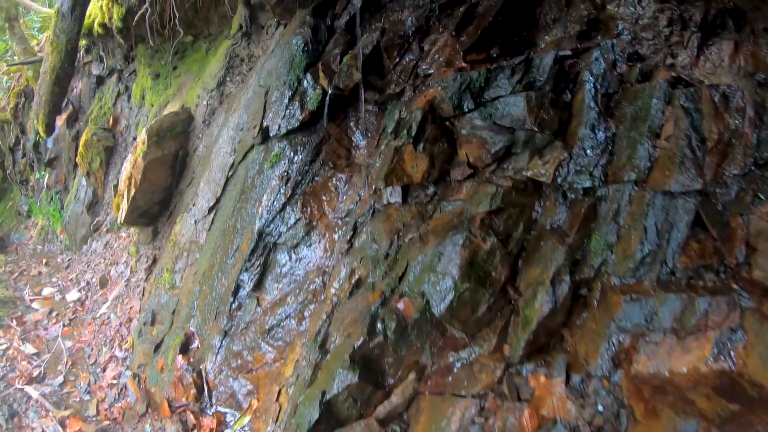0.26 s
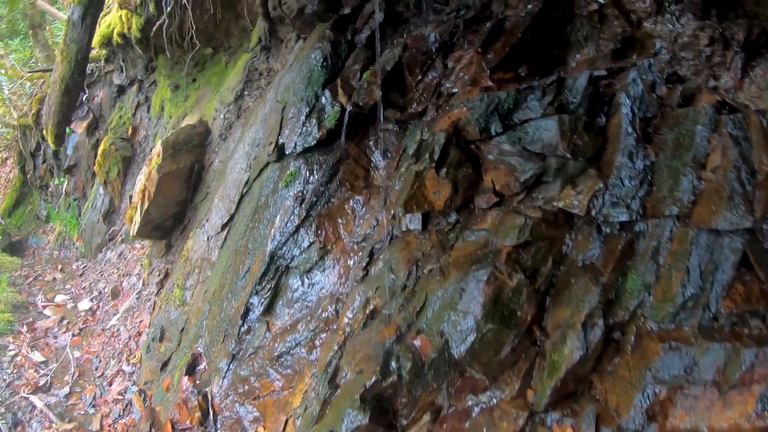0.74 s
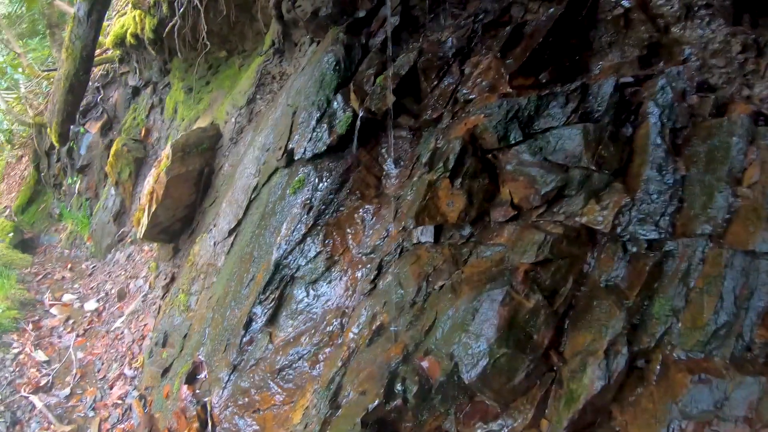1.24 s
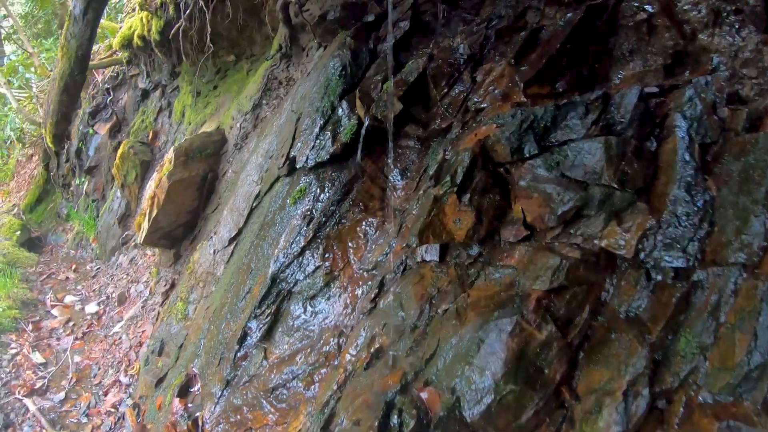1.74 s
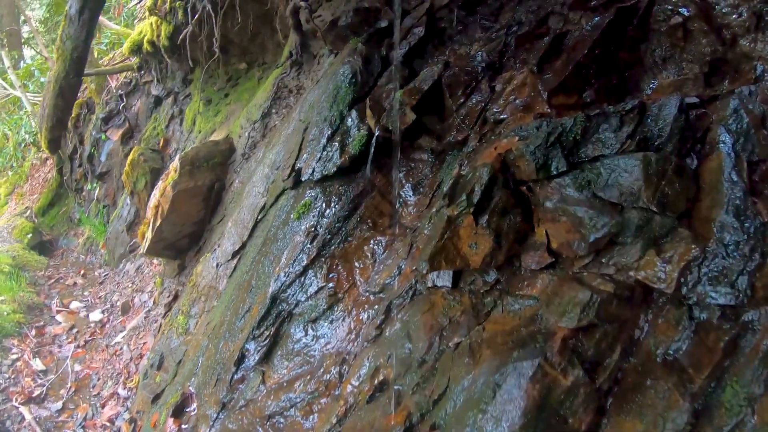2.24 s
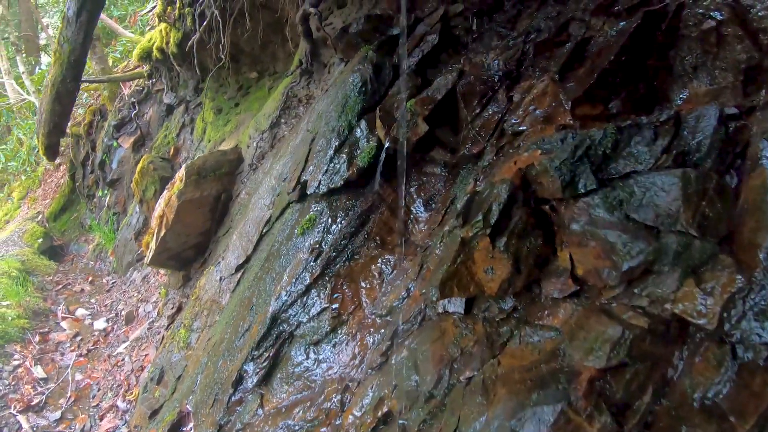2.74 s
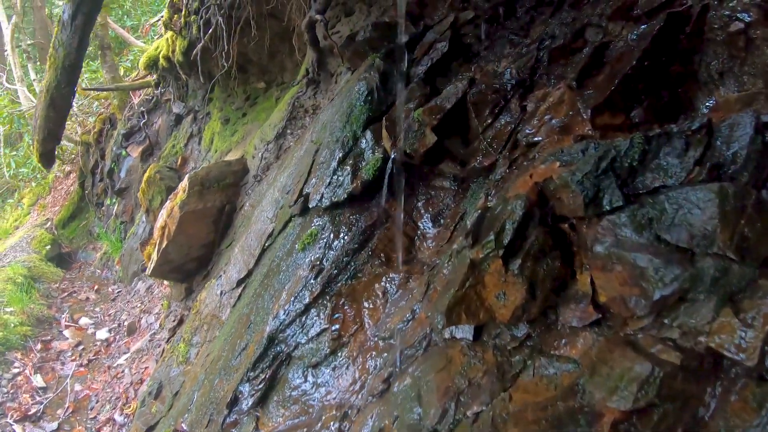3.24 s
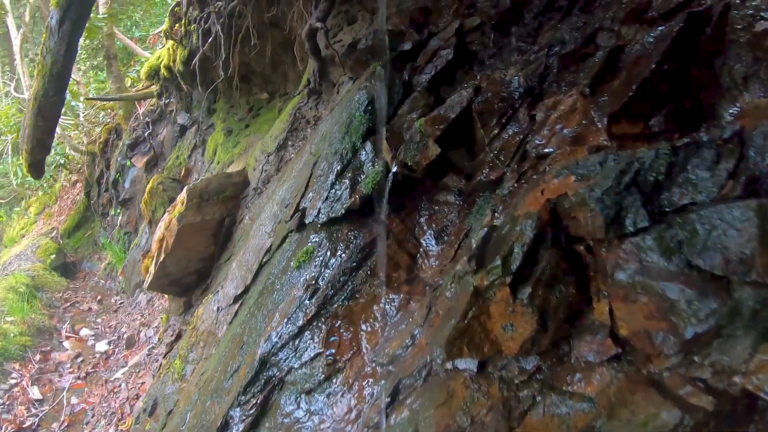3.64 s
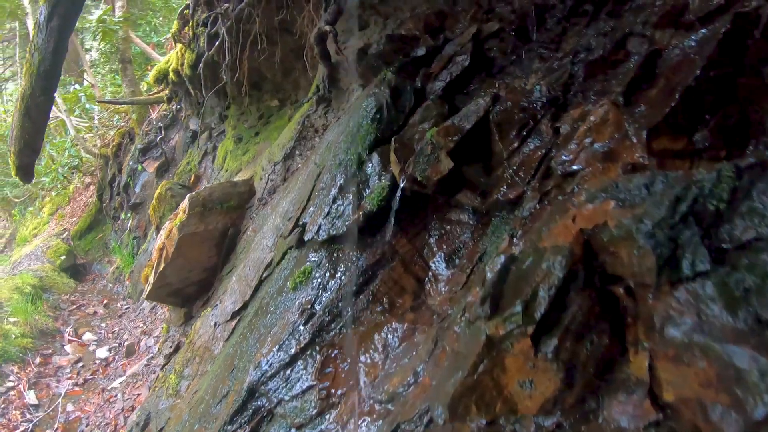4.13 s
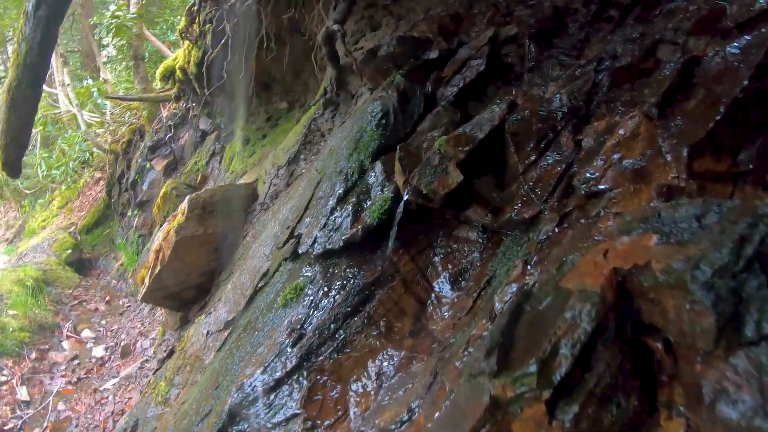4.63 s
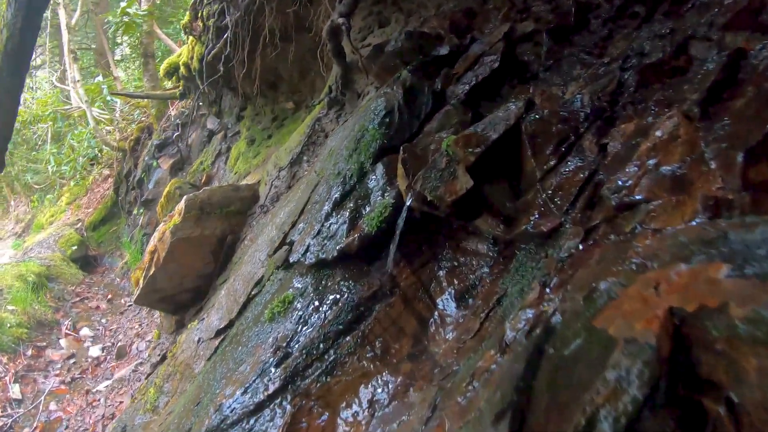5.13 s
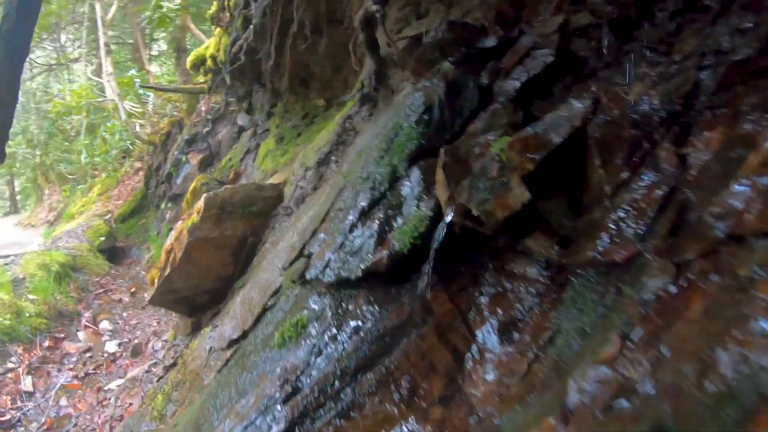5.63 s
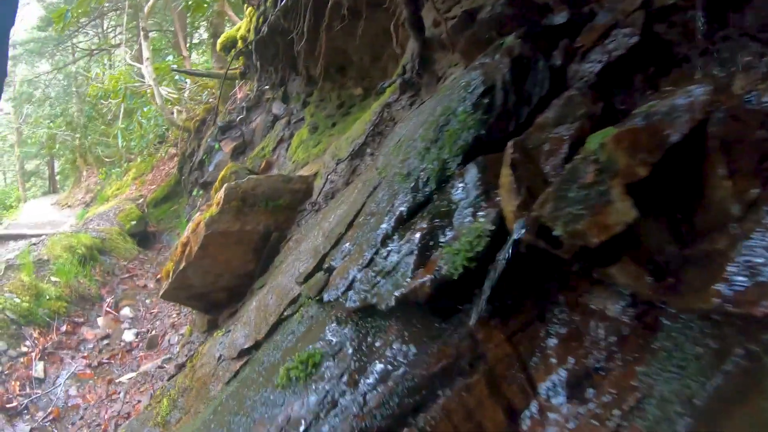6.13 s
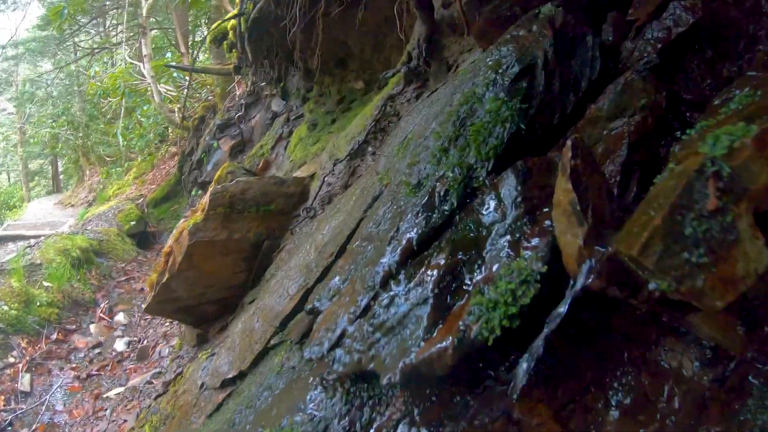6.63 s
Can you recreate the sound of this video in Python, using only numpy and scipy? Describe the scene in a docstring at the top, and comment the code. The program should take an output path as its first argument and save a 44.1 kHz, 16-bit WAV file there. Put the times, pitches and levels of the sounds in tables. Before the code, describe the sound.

Close, crisp dripping from a rocky overhang, about two dozen drips a second with varied pitches, short rough echoes and a faint hissing trickle.

```python
"""From the start, drops fall quickly from a wet rock overhang in a forest, close to a small stereo camera.
Each pops at its own pitch, throws noisy spray and is answered by dense short echoes from the broken rock.
All along, small pops sound, small droplets patter, and shaped noise makes a thin fizzing trickle and
a murmuring far stream. A faint humming band of noise sinks in pitch; a deep rumble grows near the end."""
import sys
import numpy as np
from scipy import signal
from scipy.fft import rfft, irfft, next_fast_len
from scipy.io import wavfile
from scipy.ndimage import uniform_filter1d, map_coordinates

SR = 44100
rng = np.random.default_rng(int(sys.argv[2]) if len(sys.argv) > 2 else 0)


def natural_amplitude(level_db):
    """Convert a level in decibels to a linear amplitude factor, elementwise."""
    exponent = np.asarray(level_db, float) / 20
    return 10 ** exponent


def dump_mix(stems):
    """Bounce the given channels to the path in sys.argv[1] as a 16-bit WAV at rate SR."""
    frames = np.atleast_2d(stems).T  # one column per channel
    limited = np.clip(frames, -1, 1)  # hard clip at full scale
    pcm = np.round(limited * 32767).astype(np.int16)
    wavfile.write(sys.argv[1], SR, pcm)


N = 302991  # length in samples

# The clear drops. Each row: start in seconds, level in dB, pitch of the pop in Hz,
# level of the spray's treble in dB, sharpness of the pop's pitch (a plain number).
CLEAR_DROPS = [(0.037, -37, 9700, -37.5, 5.4), (0.1013, -35, 4700, -44, 1.7),
               (0.172, -32.5, 4000, -44, 1.4), (0.2062, -24, 9800, -42, 5), (0.285, -33.5, 4300, -46, 7.7),
               (0.3064, -34, 7640, -65, 9.9), (0.416, -35.5, 2430, -53, 3.1), (0.465, -45, 4400, -73, 4),
               (0.5377, -40.5, 2500, -44.5, 3.6), (0.61, -28.5, 4430, -38.5, 0.68),
               (0.661, -32, 10000, -40.5, 1.8), (0.6864, -34.5, 1920, -38, 0.66),
               (0.701, -19, 4960, -59, 2.1), (0.8248, -30, 4130, -64, 3.5), (0.864, -29.5, 4030, -63, 2.8),
               (0.917, -41, 3260, -50, 2.8), (0.9666, -34.5, 2580, -40, 2), (0.9858, -37, 6960, -38, 7.9),
               (1.03, -28.5, 4530, -37.5, 1.4), (1.0866, -33.5, 3200, -51, 2.9),
               (1.1161, -32.5, 4830, -39.5, 1.7), (1.1619, -31, 6900, -40, 2.7),
               (1.244, -42, 6950, -39, 0.33), (1.29, -35, 3800, -51, 0.51), (1.321, -32, 3920, -43, 1.3),
               (1.3607, -32.5, 6140, -63, 4.6), (1.3813, -35, 9310, -43, 1.9), (1.398, -34, 3780, -39, 1.1),
               (1.4975, -22, 4050, -59, 1.7), (1.527, -37, 3330, -44, 2.7), (1.5492, -34, 6400, -59, 2.8),
               (1.5773, -28, 5900, -41.5, 1.6), (1.621, -45.5, 3220, -62, 3), (1.6894, -43, 3500, -44, 1.9),
               (1.7129, -22, 3960, -29.5, 2), (1.779, -41, 3980, -38.5, 2.9), (1.81, -35, 5850, -34, 6.5),
               (1.8917, -35, 2890, -65, 1.7), (1.932, -12.5, 2530, -39, 1.58), (1.987, -57, 6500, -72, 4),
               (2.032, -36, 5130, -40, 4.7), (2.056, -39, 3000, -47, 0.53), (2.0925, -32, 4140, -46, 2.3),
               (2.135, -41, 9500, -61, 2.7), (2.156, -24.5, 3710, -40, 3.6),
               (2.184, -34.5, 3660, -45.5, 5.5), (2.2653, -34.5, 3530, -39, 4.2),
               (2.327, -36, 7750, -38, 3.7), (2.352, -37, 5050, -34.5, 1.2),
               (2.3995, -32.5, 7500, -44, 1.5), (2.441, -40.5, 6320, -66, 7.7),
               (2.4883, -38.5, 5200, -40, 10), (2.511, -24.5, 3070, -42, 2.4),
               (2.593, -37.5, 3500, -39.5, 2.3), (2.653, -31.5, 4170, -67, 4.3),
               (2.7255, -40, 3100, -73, 3.3), (2.7694, -42, 1680, -63, 2.6), (2.802, -31, 4130, -51, 6),
               (2.842, -27.5, 2500, -42.5, 1.3), (2.8714, -30.5, 2660, -42.5, 1.9),
               (2.909, -41, 4500, -43, 7), (2.9432, -39, 3700, -35, 4), (2.962, -31.5, 3600, -67, 5.3),
               (3.027, -21, 2850, -38, 1.54), (3.054, -30, 5250, -61, 1.3), (3.1053, -36.5, 3320, -44, 5.9),
               (3.144, -30, 7600, -57, 1.7), (3.1888, -42, 5600, -41, 1.4), (3.211, -38, 9850, -47, 2.5),
               (3.2298, -31, 9710, -60, 3.7), (3.257, -39, 6470, -62, 2.4), (3.291, -34, 3320, -35.5, 2.1),
               (3.3398, -36, 5900, -65, 1.2), (3.37, -34, 9900, -72, 6), (3.4024, -26, 9000, -38.5, 1.5),
               (3.503, -32.5, 2680, -68, 4.9), (3.5443, -39, 5640, -63, 2.3),
               (3.5656, -36.5, 7500, -63, 5.4), (3.6148, -24.5, 3160, -25, 4.5),
               (3.682, -39, 7200, -39.5, 0.99), (3.738, -34, 2800, -48, 0.46), (3.816, -36, 1760, -46, 2.7),
               (3.8543, -46, 9520, -30.5, 3), (3.8686, -21, 2560, -30, 6.2),
               (3.9026, -37, 2560, -44.5, 2.8), (3.938, -38, 7560, -41, 2.1),
               (3.957, -32.5, 3070, -44.5, 4.4), (4.019, -27, 9400, -31, 3.4), (4.05, -32, 4850, -39, 3.7),
               (4.126, -30, 7570, -34.5, 5.3), (4.2126, -51, 4320, -45, 2.4),
               (4.2313, -31.5, 2870, -39, 0.4), (4.2775, -41, 6750, -59, 3.6),
               (4.317, -29.5, 6510, -34.5, 1.7), (4.3735, -43, 3560, -38, 0.87),
               (4.407, -31, 3280, -38.5, 2.4), (4.4645, -37.5, 6400, -44, 1.6),
               (4.51, -35, 7000, -40.5, 3.4), (4.541, -32.5, 4070, -42, 5.4), (4.594, -34, 3770, -40, 6),
               (4.6517, -29.5, 2080, -59, 5.4), (4.7308, -38, 3420, -37.5, 14),
               (4.768, -33, 6270, -38, 2.1), (4.778, -30, 4150, -32.5, 1.4),
               (4.8424, -35.5, 3370, -54, 3.3), (4.8541, -37, 3100, -38.5, 1.4),
               (4.902, -43, 6600, -63, 3.5), (4.9262, -38.5, 9600, -71, 2.9), (4.967, -41, 2790, -65, 3.5),
               (4.987, -34, 3500, -43.5, 2.2), (5.045, -41, 4670, -40.5, 0.65),
               (5.078, -38, 4940, -48, 1.7), (5.127, -38, 4550, -64, 11), (5.1627, -43, 2900, -48.5, 2.8),
               (5.198, -29.5, 3000, -54, 3), (5.211, -34, 4330, -35.5, 1.9), (5.2687, -16.5, 2530, -42, 3),
               (5.3145, -40, 5210, -44, 2.3), (5.331, -42.5, 2330, -59, 1.2), (5.3623, -37, 5300, -48, 6.7),
               (5.395, -37, 4310, -42.5, 3.4), (5.436, -38.5, 6800, -42.5, 3.9),
               (5.472, -37, 4190, -42, 3.2), (5.4937, -45, 3680, -42, 1), (5.5541, -38, 6180, -37.5, 1.4),
               (5.6074, -37, 3280, -45, 1.2), (5.6232, -33, 1620, -36, 5.6), (5.6506, -34, 3970, -41, 2),
               (5.694, -33, 1690, -40.5, 4.5), (5.7271, -31, 4770, -46.5, 1.6),
               (5.7575, -28.5, 7100, -57, 2), (5.7737, -15, 4600, -55, 3), (5.792, -25, 6850, -56, 0.67),
               (5.8861, -32.5, 4760, -40.5, 3.1), (5.921, -37, 3760, -69, 3.7),
               (5.939, -24, 6950, -56, 2.7), (5.9992, -41.5, 3170, -39, 3.3), (6.0515, -32, 3380, -47, 1.4),
               (6.113, -24, 3830, -33, 1.2), (6.163, -44, 7200, -41, 2.9), (6.176, -37, 3320, -44, 0.8),
               (6.213, -35, 8700, -38.5, 6.6), (6.2715, -32, 4800, -51.5, 0.73),
               (6.2927, -30, 3650, -61, 0.66), (6.3388, -25.5, 5440, -48, 1.9),
               (6.4052, -26, 4600, -38, 0.55), (6.4499, -39, 6990, -42.5, 4.4),
               (6.489, -27, 5140, -53, 1.7), (6.521, -37, 6900, -44, 2.9), (6.5407, -37.5, 4040, -40, 2.2),
               (6.6006, -36, 7140, -55, 1.9), (6.6621, -37, 5900, -40.5, 3.7), (6.666, -31, 2915, -48, 7.8),
               (6.7015, -30.5, 7660, -61, 5.4), (6.7553, -22, 5120, -27.5, 2.6),
               (6.808, -35, 3780, -38.5, 3.6), (6.848, -40, 8100, -68, 3.5)]
# The side on which the drops are heard drifts slowly. Each row: time in seconds, left over right in dB.
SIDE_DRIFT = [(0.0, 0), (0.8, -0.5), (2.5, -1.5), (4.2, -2), (5.4, -2), (6.87, -2)]
# The far water swells and ebbs. Each row: time in seconds, low gurgle level in dB, stream level in dB.
WATER_FLOW = [(0.0, -79, -65.5), (0.5, -76, -68.5), (1.3, -83.5, -66), (2.0, -76, -68.5), (2.2, -69, -68),
              (2.38, -80.5, -66.5), (2.53, -67.5, -62.5), (2.7, -81.5, -65.5), (3.1, -72.5, -68.5),
              (3.4, -79, -68), (4.0, -82.5, -66.5), (5.0, -80.5, -68), (6.0, -76, -65),
              (6.551, -73.5, -67.5), (6.87, -77, -62.5)]


def unit(x):
    """Scales a sound to an rms strength of 1."""
    return x / np.sqrt(np.mean(x ** 2) + 1e-20)


def along(points, hz):
    """Reads a curve of (Hz, value) points, with frequency on a log axis."""
    f, v = np.transpose(points)
    return np.interp(np.log(hz + 1), np.log(f + 1), v)


def wobble(rate):
    """A smooth random curve with this many knots a second."""
    knots = rng.standard_normal(int(N * rate / SR) + 4)
    return map_coordinates(knots, [np.arange(N) * rate / SR])


def pair(a, b, alike, hz):
    """Mixes two unrelated spectra into left and right, as alike as the table says."""
    turn = np.arccos(np.clip(along(alike, hz), -1, 1)) / 2
    shared, opposed = np.cos(turn) * a, np.sin(turn) * b
    return np.array([shared + opposed, shared - opposed])


def drips():
    """The clear drops pop and spray; chance sets how far each lands to one side."""
    s, db, pop_hz, treble_db, sharp = np.transpose(CLEAR_DROPS)
    lean_scatter_db = 1.1
    pan_db = np.interp(s, *np.transpose(SIDE_DRIFT)) + lean_scatter_db * rng.standard_normal(len(s))
    # the whole spray is 5.5 dB stronger than its part above 6.5 kHz
    spray_db = treble_db + 5.5 - db
    rows = np.c_[s, db, pop_hz, sharp, spray_db, pan_db]
    return splash(rows, t60=0.057, direct_db=24.5, slap_db=-16.5, ripple_db=2.5, size=4096)


def splash(rows, t60, direct_db, slap_db, ripple_db, size):
    """The pop and spray of every drop pass through that drop's own echoes, size samples long."""
    # Colour of the bursting droplets. Each row: frequency in Hz, level in dB per Hz.
    spray_colour = [(300, -60), (700, -19), (1500, -7), (3500, 0.5), (5500, 5), (8000, 3), (10000, 7.5),
                    (13500, -4), (16000, -11)]
    s, db, pop_hz, sharp, spray_db, pan_db = np.transpose(rows)[:, :, None]
    relative_sharp = np.clip(sharp, .4, 12) / 2

    # loud drops are the near ones, with more direct sound; clean ringing (1 dB per doubling) adds more
    near_db = direct_db + 0.087 * (db + 20.0) + np.log2(relative_sharp)
    # the echoes of a cleanly ringing pop die sooner
    echo_t60 = t60 * relative_sharp ** -0.3
    hz, echoes = rock_echoes(count=len(rows), size=size, direct_db=near_db, t60=echo_t60,
                             hold_s=0.004, clump_db=3.5, ripple_db=ripple_db)
    echoes = echoes * lifted_bands(hz, lift_db=6.5)

    # a ringing core on a broad slap
    core = bubble(hz, pop_hz, sharp)
    slap = bubble(hz, 0.98 * pop_hz, sharp=0.68)
    pop = core + natural_amplitude(slap_db) * slap

    # time in which the droplets of a spray part, different for each drop
    parting_s = 0.0067 * np.exp(0.72 * rng.standard_normal((len(rows), 1)))
    swell = np.sin(np.pi * np.minimum(np.arange(size // 2) / SR / parting_s, 1)) ** 2
    # cubing the noise lets single droplets stand out
    burst = rfft(rng.standard_normal(swell.shape) ** 3 * swell, 2 * size)
    spray = burst * natural_amplitude(along(spray_colour, hz))

    # the spray spreads wide and leans less than the pop
    layers = [(pop, db - 13, pan_db), (spray, db + spray_db - 13, 0.85 * pan_db)]
    sound = 0
    for colour, level_db, lean_db in layers:
        part = irfft(echoes * colour)[..., :size]
        # strength of the first 12 ms
        opening = np.sqrt(np.mean(part[..., :512].mean(0) ** 2, axis=1))[:, None]
        side_db = np.multiply.outer([.5, -.5], lean_db)
        sound = sound + part * natural_amplitude(level_db + side_db) / opening

    # add every drop into the scene at its own start
    place = (np.round(s * SR).astype(int) + np.arange(size)).ravel()
    return np.array([np.bincount(place, side.ravel(), N + size + 1)[:N] for side in sound])


def bubble(hz, centre_hz, sharp):
    """A quickly damped pocket of air; so small a source radiates little below its pitch or far above it."""
    width = centre_hz / np.clip(sharp, .4, 20)
    ring = 1j * hz * width / (centre_hz ** 2 - hz ** 2 + 1j * hz * width)
    weak_bass = 1j * hz / (1j * hz + 0.7 * centre_hz)
    weak_treble = 1 / (1 + 1j * hz / (2.2 * centre_hz))
    return (ring * weak_bass * weak_treble) ** 2


def rock_echoes(count, size, direct_db, t60, hold_s, clump_db, ripple_db):
    """Direct sound, then clumped echoes off the facets: even for a moment, then dying; new for each drop."""
    # How alike the echoes are left and right. Each row: frequency in Hz, likeness (1 is the same).
    echo_likeness = [(600, 0.13), (1500, 0.24), (3000, 0.89), (5000, 0.57), (7500, 0.0087), (15000, 0.025)]
    t = np.arange(size) / SR
    draw = rng.standard_normal((count, 3, size))
    clumps = natural_amplitude(clump_db * unit(uniform_filter1d(draw[:, 2], size=24, axis=1)))
    age = np.maximum(t - hold_s, 0)
    # the overhang rings on faintly, tapered to silence at the end
    linger = natural_amplitude(-10.5 - 60 * age / 0.085) * np.cos(np.pi / 2 * np.arange(size) / size)
    # the first echo comes after 1.1 ms
    fade = (natural_amplitude(-60 * age / t60) + linger) * (t > .0011)
    tails = draw[:, :2] * (clumps * fade)[:, None]
    hz = np.fft.rfftfreq(2 * size, 1 / SR)
    echoes = pair(rfft(tails[:, 0], 2 * size), rfft(tails[:, 1], 2 * size), echo_likeness, hz)

    # the drop reaches one side a little earlier (lag in seconds); both wait a further 0.8 ms
    lag = .00005 * rng.standard_normal((count, 1))
    side_phase = np.multiply.outer([1j, -1j], np.pi * hz * lag)
    direct = natural_amplitude(direct_db) * np.exp(side_phase - 2j * np.pi * hz * .0008)

    # each landing place favours other bands
    ripple = rfft(rng.standard_normal((count, 48)) * np.hanning(96)[48:], 2 * size).real
    return hz, (direct + echoes) * natural_amplitude(ripple_db * ripple / np.std(ripple))


def lifted_bands(hz, lift_db):
    """Fixed bands slightly strengthened in every drop's sound, over an even response."""
    # Each row: centre in Hz, width in Hz, level in dB before lift_db is added.
    bands = [(2560, 380, -26), (3320, 450, -11.5), (5130, 87, -11)]
    response = 1
    for centre, width, db in bands:
        band = 1j * hz * width / (centre * centre - hz * hz + 1j * hz * width)
        response = response + natural_amplitude(db + lift_db) * band
    return response


def small_pops():
    """Small pops with little spray and short echoes, dull to ringing; some sound along with a clear drop."""
    # Each row: start in seconds, level in dB, pitch in Hz, sharpness (a plain number), left over right in dB.
    pop_rows = [(0.1402, -44.5, 2740, 3.7, -14), (0.1432, -48, 1180, 3, -5), (0.2185, -32.5, 5240, 1.5, -2),
                (0.3477, -40, 6100, 9, 2), (0.416, -47.5, 1520, 3.5, -18), (0.417, -48.5, 730, 3.2, -5),
                (0.433, -35, 6100, 0.63, 0), (0.5991, -45, 6370, 9, 0), (0.6281, -39, 3080, 8.1, 1.0),
                (0.686, -45, 1410, 0.62, -21), (0.701, -29, 3020, 3.1, 2), (0.967, -41, 1310, 0.58, 1),
                (1.2437, -43, 1270, 1.2, -17), (1.2936, -43, 6300, 9, 4.0), (1.4153, -39.0, 910, 3.7, -6),
                (2.0825, -35.5, 650, 1.7, -1), (2.092, -49, 640, 2.3, -4), (2.0848, -38, 2350, 6.2, -3),
                (2.1596, -34, 2260, 1.5, -2), (2.2693, -47, 1010, 7.9, 1), (2.2813, -41, 2540, 6.4, -1.0),
                (2.401, -51.5, 1020, 8.5, 10), (2.5068, -39, 6240, 14, 1), (3.0276, -44, 4630, 14, 1.0),
                (3.1464, -39, 2700, 13, -2), (3.2621, -45, 1480, 9.1, -2), (3.4038, -43, 2450, 8.2, -15),
                (3.4257, -39, 1190, 1.3, -3), (3.4257, -36.5, 6640, 4.6, -2), (3.503, -44.5, 1460, 2.5, 1),
                (3.503, -46, 3180, 7.6, 0), (3.59, -48, 1950, 11, -2), (3.6163, -25.5, 2570, 14, -2),
                (3.6183, -36.5, 1180, 4.1, 1), (3.6435, -44, 1920, 4.6, -12), (3.729, -38, 1730, 2.6, -1),
                (4.0044, -42, 5270, 5.4, 4), (4.0194, -38, 3265, 12, -3), (4.2279, -46, 1720, 12, 1),
                (4.2419, -38.5, 2450, 7.2, -4), (4.3386, -39, 1640, 1.5, -2), (4.3736, -43, 1830, 2.9, 2),
                (4.5442, -46.5, 1690, 11, -3), (4.601, -34, 3640, 6.3, 0), (4.683, -44, 3500, 9.4, 0),
                (4.697, -44, 5400, 8, -4), (4.825, -44, 4000, 8, 0), (4.9343, -53.5, 1390, 7.3, -15),
                (5.0041, -38.5, 3760, 5.4, 0), (5.0251, -45.5, 1620, 7.8, 2), (5.2705, -41, 1140, 3.6, -6),
                (5.2702, -23, 4460, 2.5, 0), (5.3623, -40, 9100, 9, -9.0), (5.3683, -39, 1950, 3.2, -4),
                (5.6117, -34, 2160, 2.9, -6), (5.6267, -34, 3500, 6.1, -5.0),
                (5.6696, -37.5, 2930, 6.6, -5), (5.6756, -40, 1553, 14, -5), (5.6796, -36, 6050, 5.6, 2.5),
                (5.6926, -34, 3270, 4.9, -2), (5.868, -49, 1240, 5.1, -1), (5.978, -48, 1706, 12, 1),
                (5.989, -44.5, 1590, 7.5, 0), (6.0587, -38, 3770, 11, -14.5), (6.1286, -44, 1900, 9, -4),
                (6.1795, -42, 1777, 4.5, -8), (6.2972, -34.5, 1510, 5.3, 1), (6.3112, -36.5, 6300, 4.8, -5),
                (6.352, -37, 3000, 3.9, -8), (6.4059, -37.5, 1770, 2.9, -9.0), (6.4059, -42, 5940, 9, 7),
                (6.41, -49, 784, 3.7, -10), (6.4219, -37, 4950, 9, 4), (6.433, -44, 2520, 9.9, -2),
                (6.4878, -30.5, 3260, 1.9, -2), (6.541, -50.5, 800, 3.2, -11), (6.5436, -47, 1640, 11, -13),
                (6.6664, -45.5, 1210, 9, -4), (6.7172, -52, 930, 2.3, -7), (6.725, -46.5, 2390, 3, -5),
                (6.7342, -42, 7620, 8.1, -8), (6.809, -45.0, 820, 2.6, -11), (6.809, -38, 2710, 5, -8)]
    # the spray lies 40 dB under the pop
    rows = np.insert(pop_rows, 4, -40, axis=1)
    return splash(rows, t60=0.042, direct_db=26, slap_db=-14, ripple_db=1.5, size=2048)


def patter(count, top_db, range_db, sharp, t60):
    """Droplets tick at random pitches: some at any moment, some falling back just after a clear drop."""
    fallback_s, fallback_share = .022, .55  # mean flight of a thrown droplet; chance that one is thrown
    u, g = rng.random((count, 5)), rng.standard_normal((count, 4))
    parent_s = np.array(CLEAR_DROPS)[(u[:, 2] * len(CLEAR_DROPS)).astype(int), 0]
    flight_s = .004 - fallback_s * np.log(1 - u[:, 3])
    thrown_s = np.minimum(parent_s + flight_s, N / SR)
    s = np.where(u[:, 4] < fallback_share, thrown_s, u[:, 0] * N / SR)
    db = top_db - range_db * u[:, 1]
    pop_hz = np.clip(4500 * np.exp(0.482 * g[:, 0]), 1500, 11500)
    each_sharp = sharp * np.exp(.55 * g[:, 1])
    spray_db = -11 + 4 * g[:, 2]
    pan_db = np.interp(s, *np.transpose(SIDE_DRIFT)) + 2.2 * g[:, 3]
    rows = np.c_[s, db, pop_hz, each_sharp, spray_db, pan_db]
    return splash(rows, t60=t60, direct_db=21, slap_db=-4, ripple_db=3.0, size=2048)


def rush(spectrum, patchy_db):
    """Stereo noise of rms 1, coloured by a spectrum, with patches of random gain."""
    # How alike the noise is left and right. Each row: frequency in Hz, likeness (1 is the same).
    noise_likeness = [(100, 0.03), (250, 0.57), (700, 0), (3000, 0.63), (7000, 0.056)]
    z = signal.stft(rng.standard_normal((2, N + 8192)), nperseg=256)[2]
    field = rng.standard_normal(z.shape[1:])
    field = uniform_filter1d(uniform_filter1d(field, 8, 0), 8, 1)
    a, b = signal.istft(z * natural_amplitude(patchy_db * unit(field)), nperseg=256)[1]
    size = next_fast_len(len(a))
    hz = np.fft.rfftfreq(size, 1 / SR)
    sides = pair(rfft(a, size), rfft(b, size), noise_likeness, hz)
    return unit(irfft(sides * natural_amplitude(along(spectrum, hz)), size)[:, :N])


def trickle():
    """Thin running water: bright noise whose level flutters slowly and crackles quickly."""
    # Each row: frequency in Hz, level in dB per Hz.
    fizz_colour = [(500, -28), (900, -26), (1700, -14), (2200, -3.5), (3300, 1), (6300, 2), (8500, -2),
                   (10000, 7.5), (11500, 2), (13500, 3), (16000, -17)]
    level_db = -55 + 1.3 * wobble(35) + 1.3 * wobble(9.7) + 3.2 * wobble(600)
    return natural_amplitude(level_db) * rush(fizz_colour, patchy_db=3.5)


def stream():
    """The far stream: a band of middle-pitched noise that swells and ebbs."""
    # Each row: frequency in Hz, level in dB per Hz.
    murmur_colour = [(290, -22), (500, -14.5), (573, -11), (731, -5), (941, -6), (1600, -4), (2080, -7.5),
                     (3520, -120)]
    s, _, stream_db = np.transpose(WATER_FLOW)
    level_db = np.interp(np.arange(N) / SR, s, stream_db) + 1.6 * wobble(7.9)
    return natural_amplitude(level_db) * rush(murmur_colour, patchy_db=2.0)


def gurgle():
    """Water running under the stones: low noise that swells and ebbs."""
    # Each row: frequency in Hz, level in dB per Hz.
    gurgle_colour = [(200, -18), (270, 0), (400, 0), (500, -4), (620, -28), (1000, -92)]
    s, gurgle_db, _ = np.transpose(WATER_FLOW)
    level_db = np.interp(np.arange(N) / SR, s, gurgle_db) + 0.27 * wobble(3.2)
    return natural_amplitude(level_db) * rush(gurgle_colour, patchy_db=2.1)


def rumble():
    """The far rumble of the valley: deep noise that grows toward the end."""
    # Each row: frequency in Hz, level in dB per Hz.
    rumble_colour = [(35, -70), (60, -36), (102, -53), (144, -10), (189, 0), (270, -6), (350, -36),
                     (590, -120)]
    swell_s, swell_db_per_s = 5.8, 3
    swell_db = swell_db_per_s * np.maximum(np.arange(N) / SR - swell_s, 0)
    return natural_amplitude(-80 + swell_db + 0.47 * wobble(8.9)) * rush(rumble_colour, patchy_db=1.0)


def hum(flutter):
    """A faint fuzzy hum: a tone whose strength flutters at random, partly differently on each side."""
    # The hum sinks slowly. Each row: time in seconds, pitch in Hz, level in dB.
    hum_path = [(0.0, 780.6, -76.5), (1.5, 759, -78.5), (3.0, 720, -83.5), (4.7, 670, -78), (5.6, 660, -84)]
    s, hz, db = np.transpose(hum_path)
    t = np.arange(N) / SR
    tone = np.sin(2 * np.pi * np.cumsum(np.interp(t, s, hz)) / SR)
    strength = wobble(flutter) + np.array([wobble(flutter), wobble(flutter)])
    return natural_amplitude(np.interp(t, s, db)) * unit(tone * strength)


def scene():
    """Near drops, small pops, small droplets, the flowing water, the rumble and the hum."""
    near = drips() + small_pops()
    droplets = patter(count=1600, top_db=-45.0, range_db=25.5, sharp=4.5, t60=0.038)
    background = trickle() + stream() + gurgle() + rumble()
    return near + droplets + background + hum(flutter=76)


def top_cut(x):
    """Nothing passes above the cut-off."""
    return signal.sosfilt(signal.butter(12, 16430, fs=SR, output="sos"), x)


def record(dry):
    """The camera's microphones weaken the deepest bass and the high treble."""
    # Each row: frequency in Hz, gain in dB.
    microphone_gain = [(60, -9), (110, -10.5), (150, 3), (8000, -1), (10000, -4.5), (11000, -9),
                       (12500, -14), (14500, -12.5), (15700, -23), (16400, -62)]
    size = next_fast_len(N + 8192)
    hz = np.fft.rfftfreq(size, 1 / SR)
    heard = irfft(rfft(dry, size) * natural_amplitude(along(microphone_gain, hz)), size)[:, :N]
    return top_cut(heard)


dry = scene()
out = record(dry)
dump_mix(out)
```